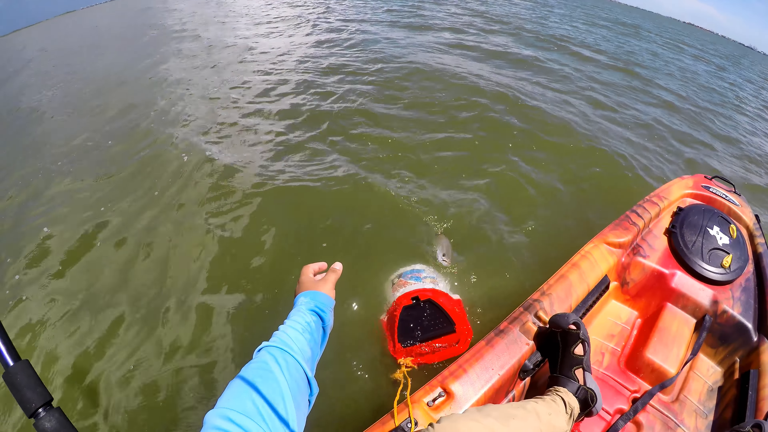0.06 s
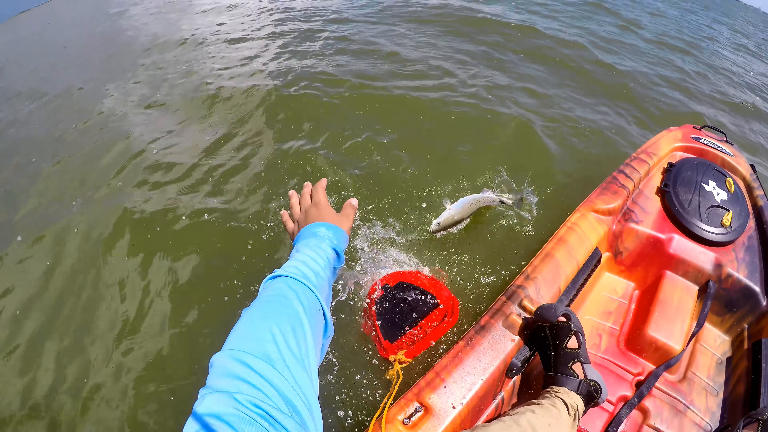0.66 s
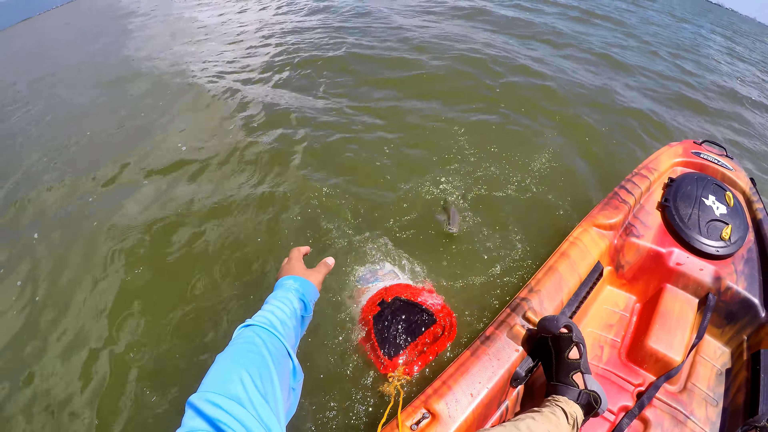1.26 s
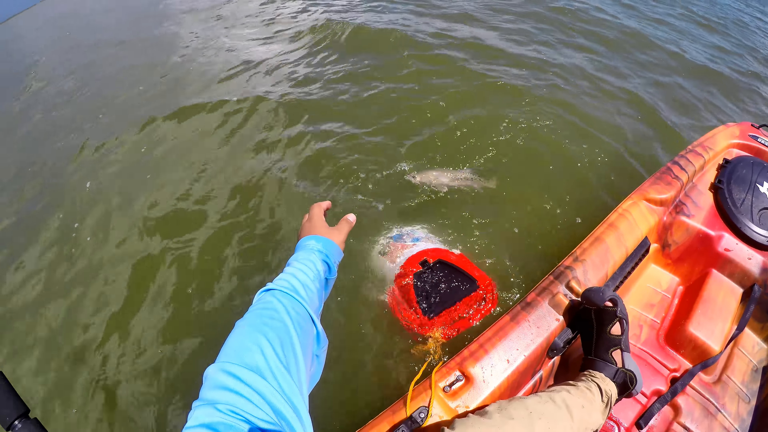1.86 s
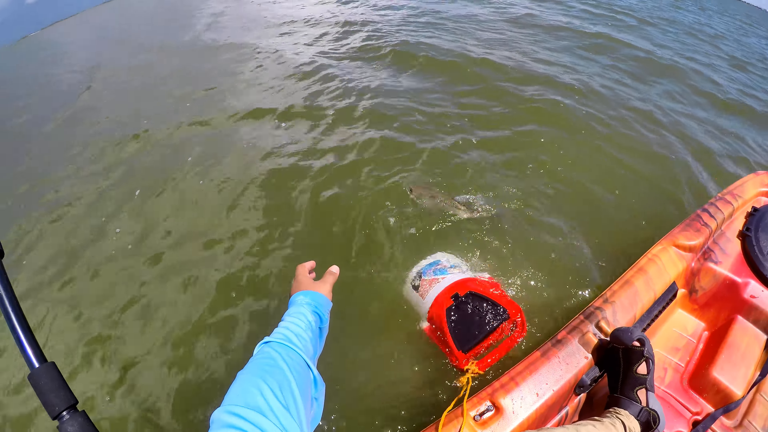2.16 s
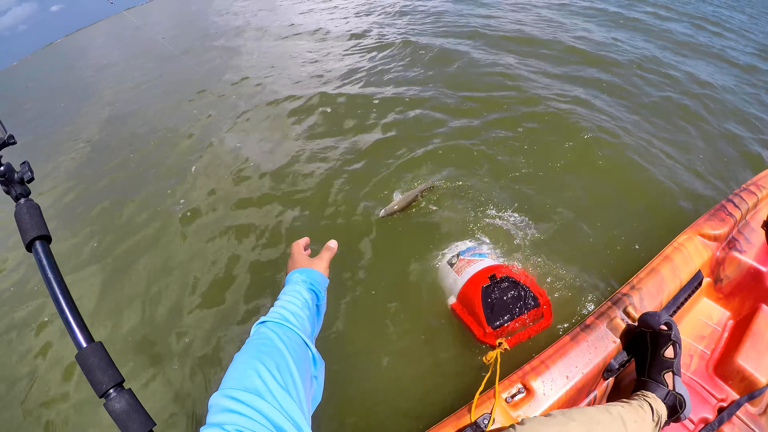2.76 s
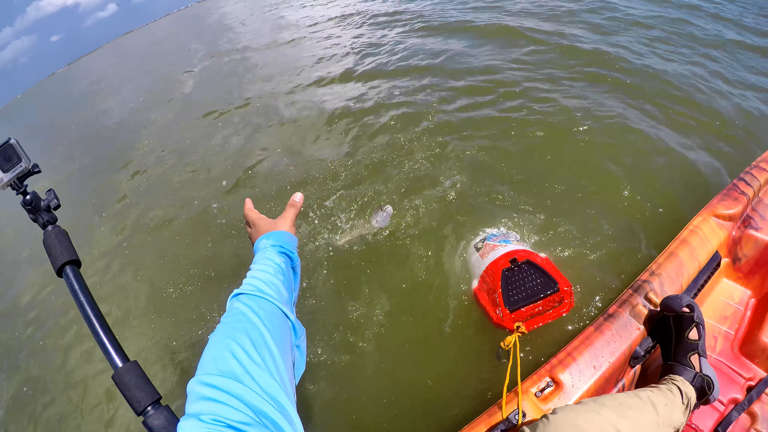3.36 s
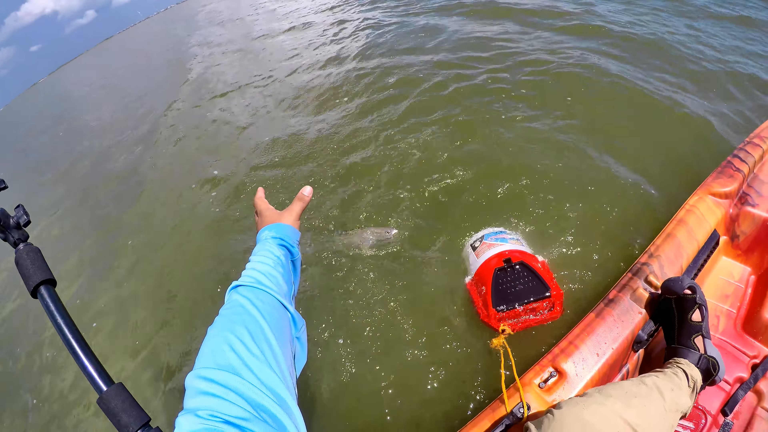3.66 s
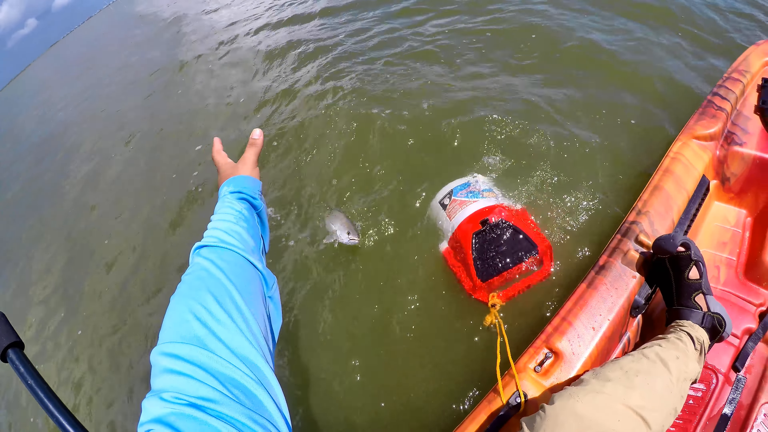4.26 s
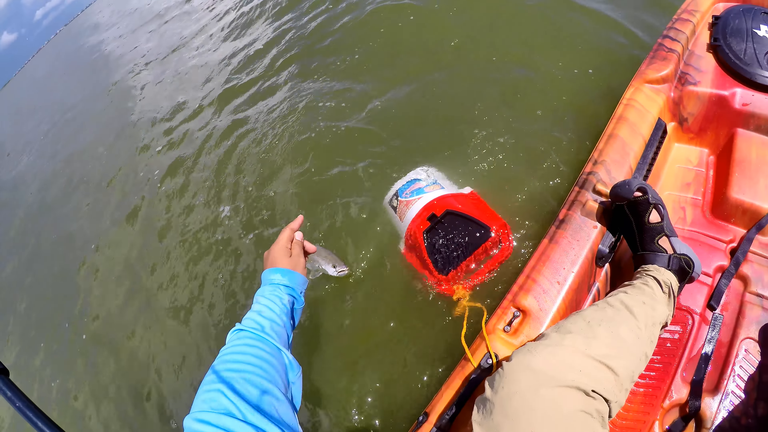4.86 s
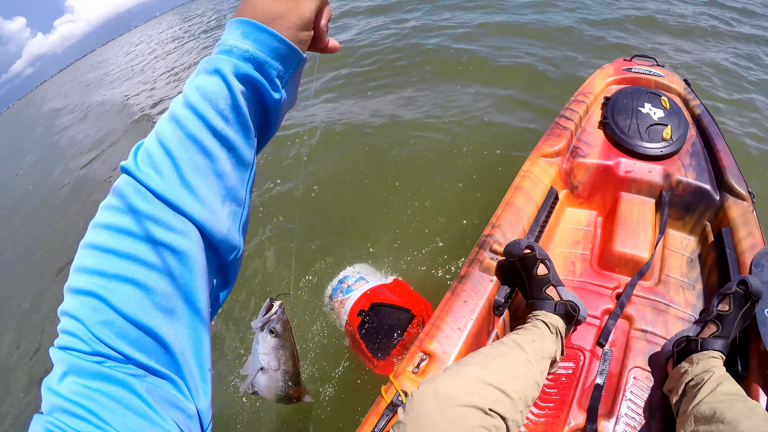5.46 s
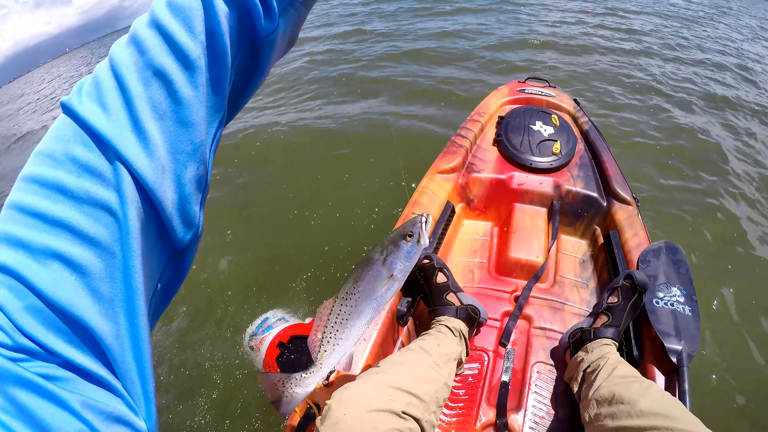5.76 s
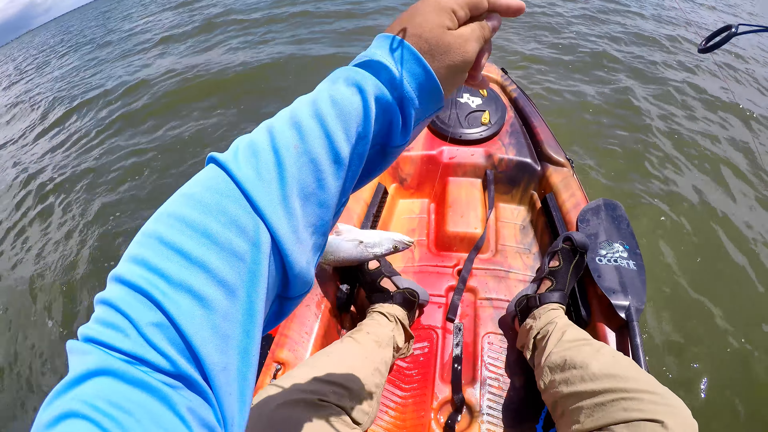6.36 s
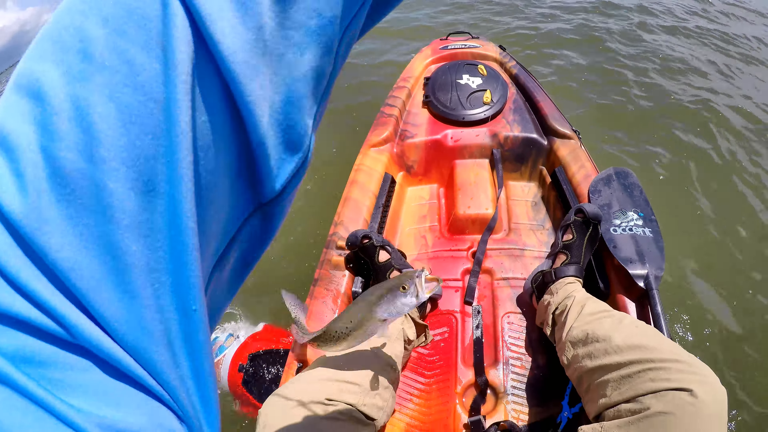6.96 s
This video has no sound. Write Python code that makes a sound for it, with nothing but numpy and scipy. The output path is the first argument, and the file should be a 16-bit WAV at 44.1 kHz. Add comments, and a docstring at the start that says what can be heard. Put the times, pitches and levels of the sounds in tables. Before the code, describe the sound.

Low, gusty wind buffets a body-worn microphone over faint choppy open water, strongest in the first two seconds, with no echo. After a few tackle ticks, a hooked fish thrashes close by from 0.4 to 1 second: sharp tail slaps, spray, drips and the bright rattle of beads in a hollow lure. Small splashes and gurgles follow, then a second rattling thrash around 3 seconds. From about 3.8 seconds the loaded tackle ticks and creaks, squealing faintly at 4.2 as the wind eases. The lure rattles at 4.5 and repeatedly from 5.2 on. A fast creak runs from 5.3 to 5.8, ending in another short squeal. From 6 seconds the fish flaps against a leg and the plastic kayak hull with wet smacks and hollow thuds, strongest near 6.4. A wet sleeve scuffs and squeaks around 6.9 as the gusts return.

```python
"""First a hooked fish thrashes beside a plastic kayak: its tail slaps the water, bubbles ring in the
spray and beads rattle in a hollow lure. From about 4 s it is swung aboard, and stick-slip friction
makes the loaded tackle creak and twice squeal. From 6 s it flaps against leg and hull, exciting the
hull's modes; near 7 s a wet sleeve scuffs and squeaks. Throughout, turbulent wind buffets the two
ports of a body-worn microphone over a faint wash of choppy water."""
import sys
import numpy as np
from scipy import signal
from scipy.io import wavfile

SR = 44100
rng = np.random.default_rng(int(sys.argv[2]) if len(sys.argv) > 2 else 0)


def to_wav(s):
    """Save 16-bit WAV."""
    ch = np.atleast_2d(s).T  # columns
    pcm = np.round(np.clip(ch, -1, 1) * 32767)  # PCM
    wavfile.write(sys.argv[1], SR, pcm.astype(np.int16))


N = 318881
TIME = np.arange(N) / SR
CUTOFF_HZ = 15000
SIDES = np.array([[.5], [-.5]])  # each port takes half of a left-right difference

# Levels are relative, before each source's gain. Pan and lead are left re right in level and phase.
# Tail slaps: t/s, level/dB, decay/s
TAIL_SLAPS = [(.457, -34, 0.0018), (.512, -37, 0.006), (.6, -32, 0.0051), (.686, -15.5, 0.003),
              (3.003, -33.5, 0.039), (3.089, -29, 0.0075), (3.097, -39, 0.0036), (3.21, -31, 0.012)]
# Sheets of thrown water: t/s, duration/s, level/dB
SPLASHES = [(0.434, .21, -38.5), (0.701, .25, -37.5), (1.071, .04, -46.5), (1.458, .03, -48),
            (2.164, .025, -50), (2.369, .035, -47), (2.748, .05, -51), (2.871, .1, -45.5),
            (2.991, .025, -35), (3.07, .032, -33), (3.181, .025, -39), (3.219, .19, -42.5),
            (4.028, .03, -50)]
# Wet fish writhing against the line and clothes: peak t/s, level/dB
TWISTS = [(5.205, -53), (5.276, -36), (5.436, -38), (5.621, -41.5), (6.025, -39), (6.175, -40), (6.23, -60),
          (6.3, -54), (6.372, -50), (6.444, -38), (6.781, -34), (7.035, -38), (7.23, -42)]
# Spectral density of spray: f/Hz, level/dB
SPRAY_SPECTRUM = [(500, -20), (850, 11.5), (1300, 0.5), (1800, 8), (2400, -1), (3500, 4), (4900, 1),
                  (6200, 3.5), (7400, -14.5), (8500, -44), (10500, -22), (12500, -21), (15500, -31)]
# Largest drops: t/s, level/dB, nominal f/Hz
DROPS = [(0.44, -40, 3670), (0.5428, -29, 3760), (0.597, -34, 980), (0.608, -41, 1210), (0.619, -37, 980),
         (0.641, -33, 1610), (.655, -37, 1130), (0.834, -31, 4330), (0.911, -31.5, 2970),
         (.938, -35.5, 6200), (1.092, -32.5, 2040), (1.271, -41.5, 4230), (1.387, -40, 4700),
         (1.486, -37.5, 5930), (2.179, -43.5, 5270), (2.246, -47.5, 4470), (2.397, -36.5, 900),
         (2.443, -41.5, 4350), (2.755, -39.5, 4030), (2.794, -39, 4400), (2.852, -41.5, 1550),
         (2.883, -35, 4640), (2.926, -32.5, 2570), (3.003, -31.5, 925), (3.322, -35.5, 4320),
         (3.384, -33, 5700), (3.457, -38, 4130), (3.502, -47, 3100), (4.043, -35.5, 3670)]
# Rising air pockets: t/s, duration/s, level/dB, start f/Hz, end f/Hz
AIR_POCKETS = [(0.574, 0.035, -42, 1120, 1390), (.623, .025, -38, 1390, 1670),
               (.733, 0.024, -38, 1530, 1810), (.787, 0.015, -45, 1670, 1920),
               (0.826, 0.011, -38, 960, 1160), (0.831, 0.015, -34, 1450, 1710),
               (0.856, 0.023, -39, 934, 1080), (0.886, .009, -28, 2900, 3230),
               (.919, 0.012, -31, 910, 1100), (.955, .016, -46, 1600, 1850), (.963, .014, -32, 2530, 2920),
               (0.994, 0.024, -38.5, 1190, 1450), (1.068, 0.016, -36, 830, 1050),
               (1.086, 0.014, -35, 1800, 2530), (1.318, 0.024, -47, 1930, 1700),
               (1.502, 0.02, -43, 2020, 1900), (1.587, 0.026, -55, 1510, 1800),
               (2.113, .025, -47, 1250, 1650), (2.196, .018, -42, 2110, 1820),
               (2.378, .03, -49, 1135, 1460), (2.483, .014, -45, 1500, 1650),
               (2.677, 0.025, -46, 1400, 1650), (2.983, 0.017, -32, 1830, 1600),
               (3.013, .025, -38, 770, 950), (3.035, .022, -44, 1430, 1690), (3.112, .025, -45, 1750, 2040),
               (3.173, 0.016, -37, 1340, 1550), (3.285, 0.016, -29, 1590, 2000),
               (3.322, .03, -42, 1060, 1290), (3.355, 0.038, -43, 1290, 1570),
               (3.42, 0.022, -51, 1600, 1950)]
# Lure shakes: t/s, ping level/dB, ping f/Hz, clack level/dB, clack f/Hz, snap level/dB,
# bead return delay/s, return level/dB re the shake, pan/dB
SHAKES = [(0.4552, -22, 6280, -24, 2490, -39, 0.0037, -12, 6),
          (0.4873, -18.5, 6100, -45, 1810, -49.0, 0.0023, -11, 5),
          (0.5104, -19.5, 5860, -26, 3300, -39, 0.0092, -16, 5),
          (0.601, -23, 5930, -30, 2850, -43.5, 0.005, -14, 6),
          (0.6855, -20.5, 6750, -25.5, 2780, -35.5, 0.0041, -7, 10),
          (0.709, -21, 6700, -25.5, 3900, -43, 0.0097, -25, 5),
          (0.7342, -29, 5840, -45, 3790, -59.5, 0.014, -3, 4),
          (0.7623, -17, 6130, -49, 4380, -45, 0.0041, -16, 4),
          (2.9659, -21.5, 6650, -29, 2780, -37, 0.0046, -9, 7),
          (3.0004, -20.0, 5860, -31, 4390, -34, 0.008, -2, 2),
          (3.0907, -25, 6100, -24.5, 3850, -40, 0.0069, -1, 7),
          (3.1304, -28.5, 6000, -34.0, 2430, -45, 0.0037, -7, 4),
          (3.1919, -22.5, 5980, -33.5, 2690, -43, 0.0062, -8, 4),
          (3.2072, -25, 5960, -32.5, 2850, -42, 0.0034, -6, 5),
          (4.5233, -29, 6100, -36, 3200, -51, 0.0056, -3.5, 4),
          (4.5378, -36, 5960, -38, 2430, -62.5, 0.0033, -15, 3),
          (4.582, -26.5, 6090, -34, 2870, -45, 0.0072, -4.5, 3),
          (5.21, -18, 6100, -26.5, 2570, -38.5, 0.0038, -12, 6),
          (5.2433, -19.5, 6050, -43, 2870, -44, 0.0034, -23, 10),
          (5.2618, -19, 5960, -32, 2770, -39.5, 0.0054, -7, 8),
          (5.288, -28.0, 6000, -36.5, 2970, -51, 0.0063, 0, 7),
          (5.4071, -21, 6040, -35.0, 2530, -59, 0.014, -5, 7),
          (5.4227, -27.0, 6000, -31.5, 2820, -45, 0.0124, 2, 2),
          (5.4398, -25.5, 6400, -29.5, 2900, -42, 0.0061, -8, 11),
          (5.6071, -30.5, 6020, -36, 2780, -49, 0.0096, 0.5, 6),
          (5.812, -23, 5870, -30, 4600, -43, 0.0045, -8, 3),
          (5.847, -35.5, 5760, -38.5, 2660, -57, 0.0055, -12, 3),
          (5.9382, -33, 5700, -45.5, 2820, -56, 0.0057, -6, 1),
          (5.9536, -33, 5940, -38, 2750, -49, 0.0042, -5, 3),
          (5.9786, -30.5, 5800, -38, 3000, -47, 0.0081, -2, 2),
          (6.0187, -25.5, 5660, -27.5, 2820, -47.5, 0.0076, -0.5, 1),
          (6.051, -22, 5700, -28, 1760, -43.0, 0.004, -2, 4),
          (6.1224, -31.0, 5700, -34, 2710, -48.0, 0.012, 4, 4),
          (6.1338, -38, 5800, -28.5, 2520, -56, 0.0043, -24, 1),
          (6.1599, -35, 6310, -28.5, 4130, -60, 0.012, 7.5, 7),
          (6.1858, -15, 6090, -27.5, 2290, -45, 0.0039, -19, 8),
          (6.2231, -20, 6100, -27.5, 2970, -40, 0.0062, -3, 5),
          (6.3032, -19.5, 5870, -25.5, 4800, -39, 0.015, -23, 7),
          (6.366, -21.5, 6280, -30.5, 2780, -39, 0.0066, -0.5, 7),
          (6.4085, -32.0, 5810, -46, 1810, -59.5, 0.0031, -16, 7),
          (6.531, -26, 5980, -38, 3000, -53, 0.0041, -3, 6),
          (6.5973, -34.5, 5950, -39.5, 2800, -55, 0.0047, -8, 5),
          (6.774, -24, 5950, -29, 2900, -47, 0.0089, -2, 5),
          (6.7841, -28, 6340, -33, 3200, -49, 0.0041, -17, 6),
          (7.0183, -27, 5900, -31.0, 2950, -45, 0.0026, -7, 3),
          (7.0352, -25.5, 5900, -31, 3280, -56, 0.0052, -6, 6),
          (7.1507, -31.5, 5960, -39.5, 2830, -61, 0.0117, -23, 5)]
# Faint onset just before each click, then bead hits just after it: t/s re the click, level/dB
ONSET_AND_AFTER_HITS = [(-.003, -18), (-.0011, -10.5), (.0017, -18.5), (.0036, -9)]
# Modes of the lure's shell and body: f/Hz, bandwidth/Hz, level/dB, pan/dB, lead/rad
LURE_SHELL_MODES = [(5180, 690, -19.5, -3, 1.19), (5760, 160, -19, 8, 1.3), (6120, 300, 4.5, 2.5, 2.01),
                    (6460, 420, -3.5, 5, 1.95), (6930, 310, -8.5, -1.5, 2)]
LURE_BODY_MODES = [(1340, 310, -8, 3.5, -1), (2120, 820, 4, 0, -2.1), (2814, 186, -4.5, -5.5, 0.019),
                   (3470, 920, 4, -10, 1), (4200, 720, 0.5, -3, -1.65)]
# Spectral density of a bead's contact snap: f/Hz, level/dB
SNAP_SPECTRUM = [(7000, 10), (9000, 8), (10800, -3), (12800, 5), (14000, 3), (15500, -20)]
# Blows on leg and hull: t/s, smack level/dB, thud level/dB, pan/dB
BLOWS = [(6.002, -21.5, -25, 3), (6.026, -18, -27.5, 8), (6.162, -26, -17.5, 3), (6.173, -20, -14.5, 1),
         (6.182, -14.5, -38, 4), (6.403, -24.5, -19.5, 2), (6.4477, -13, -6, 1.5), (6.717, -27, -20, -1),
         (6.743, -18.5, -25.5, -6), (6.756, -23, -30, -4), (6.767, -23, -18.5, 0), (6.921, -32, -21, -19),
         (6.957, -10.5, -35, 0), (6.975, -39, -17, -20.5), (7.071, -52, -23, -20), (7.224, -28.5, -20, -10)]
# Hull modes: f/Hz, bandwidth/Hz, level/dB
HULL_MODES = [(112, 28, -12), (170, 21.7, -11.5), (212.4, 28.6, -4), (290, 14.7, -17), (351, 14.6, -18.5),
              (451, 68, -8.5), (561, 52, -11.5), (674, 40, -22.5), (890, 120, -6), (1870, 140, -15)]
# Spectral densities of wet skin, flesh and rubbed cloth: f/Hz, level/dB
SMACK_SPECTRUM = [(300, -30), (600, 4.5), (950, -0.5), (1400, -6), (2800, -9), (4500, -5.5), (6000, 1),
                  (8500, -64), (15000, -17)]
SQUELCH_SPECTRUM = [(250, -4), (550, 0.5), (900, 1), (1300, -3), (2200, -8), (3200, -16)]
SCUFF_SPECTRUM = [(1000, -27), (1350, -13), (1600, 10.5), (2150, -5), (2500, -1), (3500, 0), (6000, -8.5),
                  (9000, -112)]
# Soft bumps against the leg: t/s, level/dB
BUMPS = [(6.046, -15), (6.166, -11), (6.438, -20)]
# Single slips of the tackle: t/s, level/dB
SLOW_SLIPS = [(0.011, -28.5), (0.052, -35), (0.099, -34), (0.247, -32.5), (.828, -31), (0.857, -39),
              (.884, -33), (0.923, -37), (1.074, -33.5), (3.796, -36), (3.858, -35.5), (4.081, -32),
              (4.124, -30.5), (4.15, -33), (4.192, -32.5), (4.231, -37), (4.304, -36), (4.369, -31.5),
              (4.433, -34.5), (4.509, -32.5), (4.567, -34.5), (5.828, -33), (5.874, -31), (5.911, -33),
              (5.949, -32), (6, -28)]
# Slipping under the fish's full weight: t/s, slip rate/Hz, level/dB
FAST_CREAK = [(5.335, 72, -25), (5.437, 67.6, -27.5), (5.513, 56, -26), (5.581, 74, -26.5),
              (5.662, 48, -25.5), (5.74, 53, -25.5), (5.807, 68, -37)]
# Tackle modes: f/Hz, bandwidth/Hz, level/dB, pan/dB, lead/rad
TACKLE_MODES = [(167, 20, -1, 0, 1), (246.5, 50.4, 1.5, 1.5, 0.5), (497, 14, -18.5, 11, 1.5),
                (1010, 60, -3, -8.5, -2), (1516, 75, -16, -23.5, 1.5), (1890, 66, -11, 0.5, 1.5),
                (4000, 3900, -10.5, -13, 7.5)]
# Modes of the tackle's hollow body: f/Hz, bandwidth/Hz, level/dB
TACKLE_BODY_MODES = [(196, 31, 1.5), (280, 31, -6), (402, 28, -12.5), (556, 55, -29), (857, 37, -3)]
# Spectral densities of friction in slips and squeals: f/Hz, level/dB
GRIT_SPECTRUM = [(350, -17), (600, -30.5), (950, 28.5), (1300, -25.5), (1900, -2.5), (2600, -8.5),
                 (4200, -13.5), (7000, -10.5), (9000, -13)]
RASP_SPECTRUM = [(900, -9), (1700, 3.5), (2700, 2), (4400, 3), (5400, 5.5), (7500, -14), (9000, -50)]
# Two squealing pulls, a curve each: t/s, f/Hz, level/dB, rasp offset/dB
PULLS = [
    [(4.158, 1214, -55, 4), (4.183, 1325, -45, -2), (4.195, 1420, -44, -6), (4.203, 1514, -40, -21),
     (4.217, 1464, -45, -6), (4.24, 1352, -49, -10), (4.27, 1420, -43.5, -6), (4.29, 1230, -47, -16),
     (4.31, 1040, -62, -3)],
    [(5.66, 1176, -55, 1), (5.686, 1303, -40.5, -3), (5.698, 1457, -37, -2), (5.706, 1526, -41, -16),
     (5.722, 1516, -32.5, -11), (5.733, 1594, -54, -17), (5.739, 1315, -45, -10), (5.747, 1293, -37, -13),
     (5.755, 1582, -52, -11), (5.769, 1475, -42, -14), (5.785, 1383, -41.5, -24), (5.796, 1430, -41, 5),
     (5.814, 1170, -52, -4)],
]
# Jumps to the squeal's upper pitch: t/s, duration/s
PITCH_JUMPS = [(4.224, 0.0095), (4.247, 0.0087), (4.276, .015), (5.76, 0.011)]
# Resonances that weight the squeal's partials: f/Hz, level/dB
SQUEAL_RESPONSE = [(1200, -7), (1600, -2.5), (2600, -1), (3700, 4.5), (4400, 7.5), (5200, 6.5), (6200, 1),
                   (7600, -6.5), (9000, -69), (13000, -42)]
# Squeak of the wet sleeve: t/s, f/Hz, level/dB
SLEEVE_SQUEAK = [(6.856, 1750, -53), (6.864, 1786, -35), (6.889, 2046, -30), (6.909, 1946, -31),
                 (6.935, 1840, -37), (6.946, 1740, -48)]
# Wind strength at the ports: t/s, level/dB
WIND_STRENGTH = [(0, -26), (.42, -21), (.58, -26), (.84, -25), (.95, -21), (1.62, -22.5), (1.9, -29),
                 (2.1, -25.5), (2.4, -32), (2.68, -23.5), (2.8, -26), (3.66, -25), (3.82, -23),
                 (4.0, -31.5), (4.65, -35), (5.2, -32.5), (6.1, -33), (7.23, -27)]
# Gusts on the housing: t/s, duration/s, level/dB
GUSTS = [(-.03, 0.16, -23.5), (0.12, 0.4, -25), (0.548, 0.16, -29.5), (1.075, 0.096, -18.5),
         (1.172, 0.054, -18), (1.329, 0.14, -26.5), (1.621, 0.18, -25), (1.753, 0.14, -26),
         (1.86, 0.15, -28), (1.994, 0.53, -33.5), (2.586, 0.092, -24), (2.915, 0.13, -30.5),
         (3.264, 0.088, -32), (3.601, 0.055, -21), (3.678, 0.15, -27), (4.11, 0.057, -32.5),
         (5.924, 0.15, -37), (6.858, 0.12, -27.5), (7.046, 0.068, -26), (7.194, 0.08, -20.5)]
# Single eddies striking a port: t/s, level/dB, f/Hz
EDDY_THUMPS = [(.043, -27, 403), (.159, -23, 377), (0.213, -21, 380), (.273, -24.5, 369), (0.344, -21, 500),
               (0.361, -37, 473), (0.421, -19, 363), (.448, -25.5, 395), (.952, -33.5, 352),
               (1.11, -29, 410), (1.207, -19.5, 354), (1.383, -23, 411), (1.681, -23.5, 427),
               (1.787, -19, 394), (1.817, -16, 375), (1.89, -21, 356), (1.941, -29, 463),
               (1.987, -22.5, 574), (2.638, -23, 426)]
# Spectral densities of large, small and smallest eddies: f/Hz, level/dB
RUMBLE_SPECTRUM = [(15, 0.5), (30, -0.5), (70, -2.5), (130, -8.5), (200, -16), (300, -26.5), (500, -41)]
TURBULENCE_SPECTRUM = [(70, 3.5), (140, 2.5), (250, -4), (450, -8.5), (600, -15.5), (800, -18.5),
                       (1300, -30)]
FINE_EDDY_SPECTRUM = [(300, -1.5), (420, 0), (530, 2), (640, -19), (800, -28)]
# Spectral density of choppy water and microphone hiss: f/Hz, level/dB
AMBIENT_SPECTRUM = [(290, -56), (500, -22), (548, -11), (699, 1), (1000, -3.5), (1610, -10.5),
                    (1870, -12.5), (2490, -18), (4490, -23), (4870, -19), (7910, -18.5), (10300, -21.5),
                    (13000, -33.5), (15500, -60)]
# Likeness at the two ports of wind and of airborne sound: f/Hz, correlation
WIND_CORRELATION = [(25, 1), (70, 0.85), (160, 0.75), (320, 0.58), (600, -0.083), (1000, 0.62)]
SOUND_CORRELATION = [(500, -0.71), (1000, -0.78), (2000, 0.11), (3800, 1), (6000, 0.23), (9000, -0.38),
                     (13000, 0.24)]


def thrashing(bubbles_db=.5, plinks_db=-10.5, lapping_db=-61.5, fizz_db=-8, lifted_s=4.1):
    """Tail impacts and tiny drops radiate broadband noise; entrained air rings as bubbles."""
    flow = spray_flow(lifted_s)
    writhing = sum(from_db(db - 1.5) * flare(s, 0, rise_s=.045, fall_s=.031) for s, db in TWISTS)
    fizz = rms_one(noise(SPRAY_SPECTRUM) * from_db(4 * drift(450)))
    cloud = bubble_cloud(flow, 750, 8000, count=4600, spread=3.5, cycles=18, rise=.1, crowding=.8)
    plinks = bubble_cloud(flow, 780, 2400, count=100, spread=3.3, cycles=50, rise=.08, crowding=1.3)
    stirring = from_db(lapping_db) * (TIME < lifted_s)
    lapping = bubble_cloud(stirring, 1100, 3200, count=260, spread=2, cycles=24, rise=.12, crowding=1)
    slaps = from_db(.5) * bursts(TAIL_SLAPS, attack_s=.00012)
    bubbles = from_db(bubbles_db) * cloud + from_db(plinks_db) * plinks + lapping
    return bubbles + fizz * (from_db(fizz_db) * flow + slaps + writhing)


def spray_flow(lifted_s, attack_s=.015, trickle_db=-60):
    """Incoherent sources add in power: splashes, and a trickle until the fish is lifted."""
    power = from_db(trickle_db) ** 2 * (TIME < lifted_s)
    for s, length, db in SPLASHES:
        fallback_s = .02 + .3 * length  # longer splashes patter back for longer
        power += (from_db(db) * flare(s + attack_s, length - attack_s, attack_s / 2, fallback_s)) ** 2
    return np.sqrt(power)


def bubble_cloud(flow, low_hz, high_hz, count, spread, cycles, rise, crowding, pan_db=4):
    """Independent bubble resonances superpose; more flow makes them denser and louder."""
    out, cumulative = np.zeros((2, N)), np.cumsum(flow ** crowding)
    when, pitch, size, length, place, depth = rng.random((count, 6)).T
    onset = np.minimum(np.searchsorted(cumulative, when * cumulative[-1]), N - 1)
    hz = low_hz * (high_hz / low_hz) ** (pitch ** .7)
    db = at_hz(SPRAY_SPECTRUM, hz) - spread * np.log(size + .039)
    gain = from_db(db) * hz ** 1.18 * flow[onset] ** (1 - crowding / 2)
    lead = (2 * depth - 1) * np.pi * np.clip(1 - at_hz(SOUND_CORRELATION, hz), 0, 1) ** .5
    for k in range(count):
        ringing = bubble(hz[k], cycles * (.5 + length[k]), rise)
        add(out, onset[k] / SR, gain[k] * at_ports(ringing, pan_db * (2 * place[k] - 1), lead[k]))
    return rms_one(out) * np.sqrt(np.mean(flow ** 2))


def bubble(hz, cycles, rise):
    """Trapped air is a damped oscillator whose frequency rises as it nears the surface."""
    age = np.arange(int(cycles * SR / hz) + 2) * hz / SR / cycles
    envelope = from_db(-60 * age) * (1 - np.exp(-age * cycles))
    return envelope * np.exp(2j * np.pi * cycles * (age + rise * age ** 2 / 2))


def drops(bubble_db=14.5, tick_db=2.5, tick_s=.0047):
    """A drop's impact ticks and entrains a resonant bubble; large ones ring for fewer cycles."""
    out, t = np.zeros((2, N)), np.arange(400) / SR
    for s, db, hz in DROPS:
        ringing = bubble(hz * .97, cycles=np.sqrt(hz) / 2, rise=.15)
        add(out, s, from_db(db + bubble_db) * at_ports(ringing, rng.normal(0, .9), rng.normal()))
        tick = rng.standard_normal(len(t)) * np.exp(-t / tick_s)
        add(out, s, from_db(db + tick_db) * lowpass(tick, min(2 * hz, 6000)))
    return out


def gurgles(gain_db=4, attack_s=.0014, fade_db=-15.5, wobble=.032, pan_db=3.5, lead=.94):
    """The resonance of a large bubble wavers and glides as it rises, and ends when it bursts."""
    out, shape = np.zeros((2, N)), drift(140)
    for s, length, db, start_hz, end_hz in AIR_POCKETS:
        age = np.linspace(0, 1, int(length * SR))
        hz = start_hz * (end_hz / start_hz) ** age * (1 + wobble * shape[int(s * SR):][:len(age)])
        gate = (1 - np.exp(-age * length / attack_s)) * (1 - age ** 10)
        wave = from_db(db + gain_db + fade_db * age) * gate * phasor(hz)
        add(out, s, at_ports(wave, pan_db * rng.normal(), lead * rng.normal()))
    return out


def lure(shell_hz=6140, emphasis_db=10, emphasis_octaves=.3, stray_s=.04, snap_db=9.5, snap_s=.001):
    """Bead impacts excite the modes of the hollow lure, at another spot with each shake."""
    out, snaps = np.zeros((2, N)), []
    for s, ping, ping_hz, clack, clack_hz, snap, return_s, return_db, pan in SHAKES:
        shell = [(hz * ping_hz / shell_hz, *rest) for hz, *rest in LURE_SHELL_MODES]
        body = []
        for hz, width, db, *place in LURE_BODY_MODES:
            nearness = np.exp(-(np.log2(hz / clack_hz) / emphasis_octaves) ** 2)
            body.append((hz, width, db + emphasis_db * nearness, *place))
        clicks = [(0, 0), (return_s, return_db)]
        clicks += [(delay * rng.uniform(.6, 1.4), db) for delay, db in ONSET_AND_AFTER_HITS]
        clicks += [(stray_s * late, -13.5 - 12 * late) for late in rng.random(3)]  # later is softer
        for delay, db in clicks:
            click = from_db(ping) * lure_click(shell, scatter_db=3.5, detune=.026, pan_db=pan)
            click += from_db(clack - .5) * lure_click(body, scatter_db=-1, detune=.064, pan_db=pan)
            add(out, s + delay, from_db(db) * click)
            snaps.append((s + delay, snap + snap_db + db, snap_s))
    return lowpass(out, 7800, order=6) + bursts(snaps, attack_s=.0001, size=600) * noise(SNAP_SPECTRUM)


def lure_click(modes, scatter_db, detune, pan_db, chatter_db=-7.5, chatter_s=.00075, size=900):
    """An impulse with a chattering tail is convolved with the lure's impulse response."""
    force = from_db(chatter_db) * rng.standard_normal(size) * np.exp(-np.arange(size) / SR / chatter_s)
    force[0] = 1
    wave = signal.fftconvolve(strike(modes, scatter_db, detune, size), force[None], axes=1)[:, :size]
    wave *= from_db(pan_db * SIDES)
    return rms_one(wave) * np.sqrt(.005 * SR / size)  # the energy of 5 ms at unit power


def landing(smack_s=.0033, squelch_db=-10.5, squelch_s=.0082, thud_db=-.5, flesh_s=.002):
    """In a soft impact wet skin smacks, then yielding flesh squelches and loads the hull's modes."""
    smacks = bursts([(s, db, smack_s) for s, db, *_ in BLOWS], attack_s=.00023)
    squelches = bursts([(s, db + squelch_db, squelch_s) for s, db, *_ in BLOWS], attack_s=.001)
    out = smacks * noise(SMACK_SPECTRUM) + squelches * noise(SQUELCH_SPECTRUM)
    for s, _, db, pan in BLOWS:
        boom = strike(HULL_MODES, scatter_db=2, detune=.025, size=9000)
        loading = 1 - np.exp(-np.arange(boom.shape[1]) / SR / flesh_s)
        add(out, s, from_db(db + thud_db + pan * SIDES) * loading * boom)
    return out


def leg_bumps(hz=38, decay_s=.031):
    """A heavy, soft impact on the leg gives a strongly damped bass oscillation."""
    return sum(bursts([(s, db, decay_s)], attack_s=.0055, size=8000)
               * np.sin(2 * np.pi * hz * (TIME - s)) for s, db in BUMPS)


def creak(fast_db=-3.5, unevenness=.055, catch_s=.00308, slow_rub_s=.012, fast_rub_s=.0042):
    """Stick-slip friction excites the tackle's modes: lone ticks run together under full load."""
    s, rate, db = np.transpose(FAST_CREAK)
    slip_hz = np.interp(TIME, s, rate, left=0, right=0) * (1 + unevenness * drift(38))
    times = TIME[1:][np.diff(np.ceil(np.cumsum(slip_hz) / SR)) > 0]
    fast = list(zip(times, np.interp(times, s, db) + fast_db + rng.normal(size=len(times))))
    slow = [(t, level + 1) for t, level in SLOW_SLIPS]
    # a slow slip rubs for a moment, then catches again
    catches = [(t + catch_s * rng.uniform(.45, 1.76), level - 1.5) for t, level in SLOW_SLIPS]
    rubs = [(t, level - 3, slow_rub_s) for t, level in SLOW_SLIPS]
    rubs += [(t, level - 7, fast_rub_s) for t, level in fast]
    out = bursts(rubs, attack_s=.00054) * noise(GRIT_SPECTRUM) * from_db(-4 * SIDES)
    for t, level in slow + fast + catches:
        add(out, t, from_db(level) * strike(TACKLE_MODES, scatter_db=2.5, detune=.04, size=4000))
    for t, level in SLOW_SLIPS:
        body = strike(TACKLE_BODY_MODES, scatter_db=1, detune=.037, size=5000)
        add(out, t, from_db(level - 2.5) * body)
    return lowpass(out, 5130)  # finite contact time limits the treble


def squeal(jump_hz=2520, jump_db=7.5, waver=.0048, rough_db=4.5, pan_db=-6, lead=-1.4, harmonics=7):
    """Friction locks into self-excited oscillation; its pitch arches with the pull and briefly jumps."""
    out, rasp = np.zeros((2, N)), noise(RASP_SPECTRUM)
    jitter = 1 + waver * drift(510)
    flutter = from_db(rough_db * np.clip(drift(240), -1.5, 1.5))
    flicker_db = 4.5 * np.array([np.clip(drift(60), -2, 1.5) for _ in range(harmonics)]) - 1
    jumped = np.any([(TIME > s) & (TIME < s + length) for s, length in PITCH_JUMPS], axis=0)
    for pull in PULLS:
        s, *columns = np.transpose(pull)
        on = (TIME > s[0]) & (TIME < s[-1])
        pitch, db, rasp_db = (np.interp(TIME[on], s, column) for column in columns)
        hz = np.arange(1, harmonics + 1)[:, None] * np.where(jumped[on], jump_hz, pitch) * jitter[on]
        tone = np.sum(from_db(at_hz(SQUEAL_RESPONSE, hz) + flicker_db[:, on]) * phasor(hz), axis=0)
        gain = flutter[on] * from_db(db + jump_db * jumped[on])
        out[:, on] += gain * (at_ports(tone, pan_db, lead) + 2 * from_db(rasp_db) * rasp[:, on])
    return out


def sleeve_scuff(start_s=6.856, length_s=.0974, level_db=-36):
    """Sliding friction of cloth radiates amplitude-modulated noise."""
    weave = rms_one(noise(SCUFF_SPECTRUM) * from_db(3.7 * drift(220)))
    return from_db(level_db) * swell(start_s, length_s, edge_s=.0055) * weave


def sleeve_squeak(gain_db=-1, scatter_hz=270):
    """Uneven stick-slip of wet threads gives a noise band whose centre follows the arm's speed."""
    s, hz, db = np.transpose(SLEEVE_SQUEAK)
    slips = lowpass(rng.standard_normal((2, N)), scatter_hz, order=4)
    wave = (rms_one(slips[0]) + 1j * rms_one(slips[1])) * phasor(np.interp(TIME, s, hz))
    return at_ports(wave, pan_db=0, lead=.99) * np.interp(TIME, s, from_db(db + gain_db), left=0, right=0)


def wind(rumble_db=1, turbulence_db=-2, fine_db=-43, growth=1.05, lumps_db=3.5, top_hz=680, pan_db=-4):
    """Turbulent pressure: large eddies rumble, and gusts shed small ones off the housing in lumps."""
    wind_db = np.interp(TIME, *np.transpose(WIND_STRENGTH))
    gusts = sum(from_db(db) * swell(s, length, edge_s=.022) for s, length, db in GUSTS)
    rumble = np.hypot(from_db(wind_db + rumble_db), gusts) * noise(RUMBLE_SPECTRUM, WIND_CORRELATION)
    breeze = from_db(-41 + 2.23 * (wind_db + 27))  # eddies between gusts grow steeply with the wind
    shedding = np.hypot(gusts, breeze)
    lumps = rms_one(from_db(lumps_db * np.clip(drift(45), -2, 2)))
    buffet = shedding * from_db(turbulence_db) * noise(TURBULENCE_SPECTRUM, WIND_CORRELATION)
    fine = (shedding / from_db(-28)) ** growth  # the smallest eddies grow fastest
    buffet += fine * from_db(fine_db) * noise(FINE_EDDY_SPECTRUM, WIND_CORRELATION)
    return rumble + lowpass(buffet * lumps, top_hz, order=6) * from_db(pan_db * SIDES)


def eddy_thumps(gain_db=-7, length_s=.024, scatter_hz=90, top_hz=660, pan_db=-5.5, lead=.45):
    """An eddy striking a port squarely gives a hollow pressure pulse of a few uneven cycles."""
    out, t = np.zeros((2, N)), np.arange(int(length_s * SR)) / SR
    uneven = lowpass(rng.standard_normal((2, N)), scatter_hz)
    for s, db, hz in EDDY_THUMPS:
        real, imag = uneven[:, int(s * SR):][:, :len(t)]
        wave = (real + 1j * imag) * np.exp(2j * np.pi * hz * t) * np.hanning(len(t))
        knock = rms_one(at_ports(wave, pan_db, lead * rng.normal()))
        add(out, s - length_s / 2, from_db(db + gain_db) * knock)
    return lowpass(out, top_hz, order=6)


def ambience(level_db=-50.5):
    """Choppy water all around and microphone hiss form a stationary noise floor."""
    return from_db(level_db) * noise(AMBIENT_SPECTRUM)


def strike(modes, scatter_db, detune, size):
    """An impulse response is a sum of damped modes, here scattered in strength and frequency."""
    t, out = np.arange(size) / SR, 0
    for k, (hz, width, db, *place) in enumerate(modes):
        wave = np.exp((2j * np.pi * hz * (1 + detune * rng.normal()) - np.pi * width) * t)
        out = out + (-1) ** k * from_db(db + scatter_db * rng.normal()) * at_ports(wave, *place)
    return out


def noise(spectrum, correlation=SOUND_CORRELATION):
    """Shared and opposed noise set the correlation in each half-octave band; unit power overall."""
    low, high = spectrum[0][0], min(spectrum[-1][0], CUTOFF_HZ)
    edges = np.geomspace(low, high, int(2 * np.log2(high / low)) + 2)
    white, mid, side = rng.standard_normal((2, 2, N)), np.zeros(N), np.zeros(N)
    for k, band in enumerate(zip(edges, edges[1:])):
        bandpass = signal.butter(2, band, "band", fs=SR, output="sos")
        shared, opposed = signal.sosfilt(bandpass, white[k % 2])
        hz = np.sqrt(band[0] * band[1])
        alike, gain = np.clip(at_hz(correlation, hz), -1, 1), from_db(at_hz(spectrum, hz))
        mid += gain * np.sqrt(1 + alike) * shared
        side += gain * np.sqrt(1 - alike) * opposed
    return rms_one(np.array([mid + side, mid - side]))


def drift(hz):
    """Low-passed noise gives a random modulation of unit rms."""
    pole = np.exp(-40 * np.pi * hz / SR)
    slow = signal.lfilter([1], [1, -2 * pole, pole * pole], rng.standard_normal(N // 20 + 2002))[2000:]
    return np.interp(np.arange(N) / 20, np.arange(len(slow)), rms_one(slow))


def bursts(rows, attack_s, size=6000):
    """Envelope of exponentially damped transients, from rows of t/s, level/dB, decay/s."""
    t, out = np.arange(size) / SR, np.zeros(N)
    for s, db, decay in rows:
        add(out, s, from_db(db) * (1 - np.exp(-t / attack_s)) * np.exp(-t / decay))
    return out


def swell(s, length, edge_s):
    """Trapezoidal envelope between 0 and 1."""
    return np.clip(np.minimum(TIME - s, s + length - TIME) / edge_s, 0, 1)


def flare(s, hold_s, rise_s, fall_s):
    """Exponential growth up to time s, a hold at 1, then exponential decay."""
    exponent = np.maximum(s - TIME, 0) / rise_s + np.maximum(TIME - s - hold_s, 0) / fall_s
    return np.exp(-np.minimum(exponent, 20))


def at_ports(wave, pan_db=0, lead=0):
    """A complex wave reaches the two ports with a difference in level and phase."""
    return np.imag(wave * from_db(pan_db * SIDES) * np.exp(1j * lead * SIDES))


def phasor(hz):
    """Phase is the time integral of frequency."""
    return np.exp(2j * np.pi * np.cumsum(hz, axis=-1) / SR)


def lowpass(x, hz, order=2):
    """Maximally flat low-pass filter."""
    return signal.sosfilt(signal.butter(order, hz, fs=SR, output="sos"), x + 1e-18)


def at_hz(points, hz):
    """Interpolation on a log-frequency axis."""
    points = np.array(points)
    return np.interp(np.log(hz), np.log(points[:, 0]), points[:, 1])


def add(out, s, sound):
    """Superposition of a short sound at time s."""
    start = int(np.clip(s * SR, 0, N - 1))
    out[..., start:start + sound.shape[-1]] += sound[..., :N - start]


def from_db(db):
    """Level to amplitude ratio."""
    return 10 ** (np.asarray(db) / 20)


def rms_one(x):
    """Normalisation to unit power."""
    return x / np.sqrt(np.mean(x ** 2) + 1e-20)


def scene():
    """Open water is a free field: the direct sounds add without echo."""
    background = ambience() + wind() + eddy_thumps()
    fish = thrashing() + gurgles() + drops() + lure() + landing() + leg_bumps()
    friction = sleeve_scuff() + creak() + squeal() + sleeve_squeak()
    return fish + friction + background


def record(dry):
    """Soft saturation rounds the tallest peaks, and a steep low-pass limits the bandwidth."""
    return signal.sosfilt(signal.ellip(10, .2, 80, CUTOFF_HZ, fs=SR, output="sos"), np.tanh(dry))


dry = scene()
out = record(dry)
to_wav(out)
```